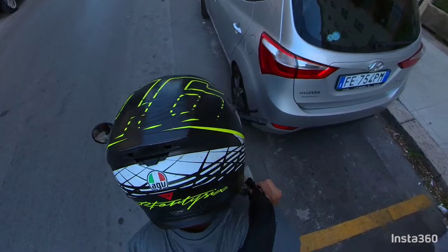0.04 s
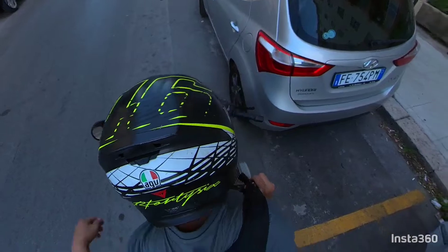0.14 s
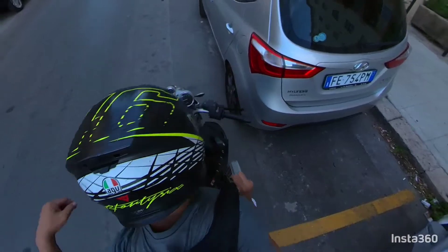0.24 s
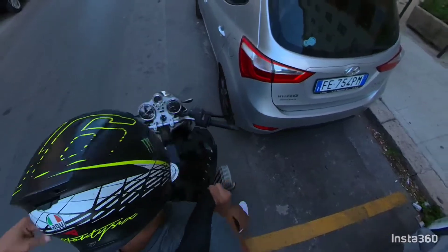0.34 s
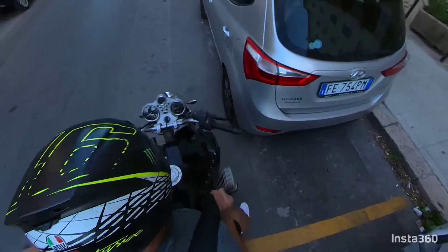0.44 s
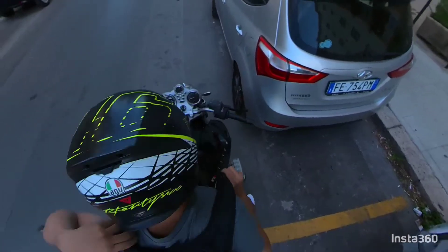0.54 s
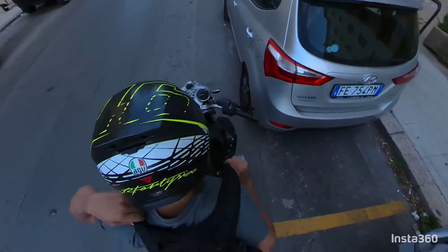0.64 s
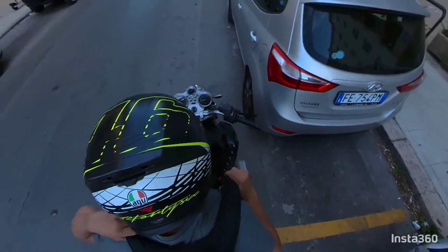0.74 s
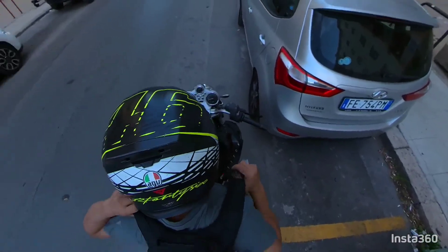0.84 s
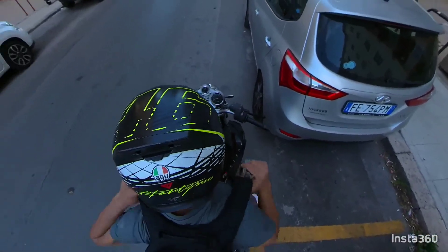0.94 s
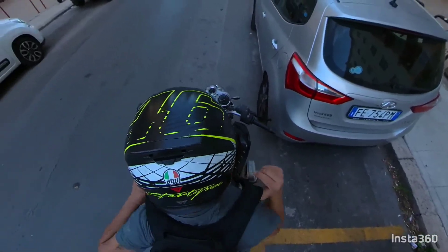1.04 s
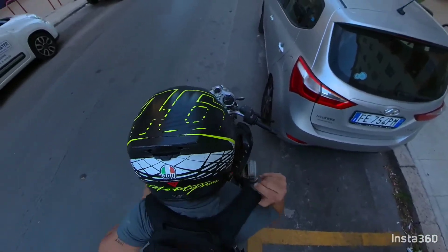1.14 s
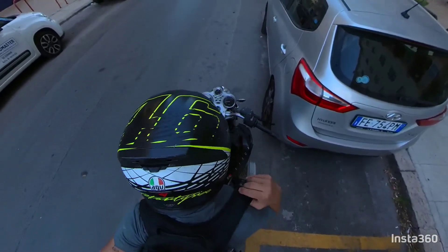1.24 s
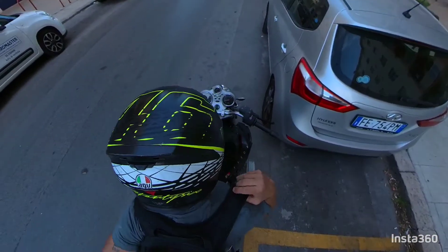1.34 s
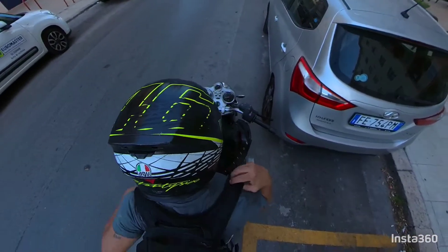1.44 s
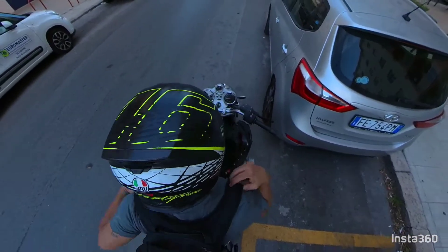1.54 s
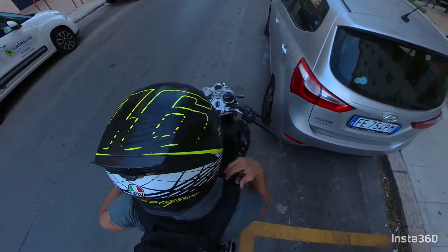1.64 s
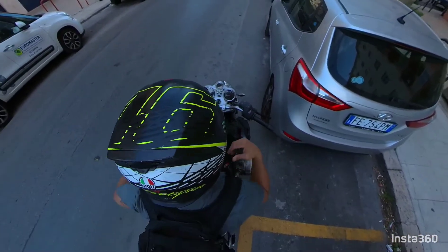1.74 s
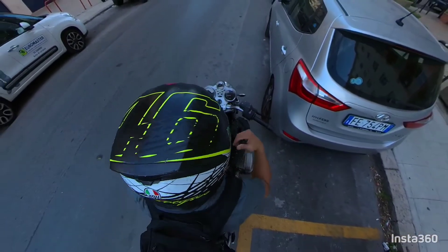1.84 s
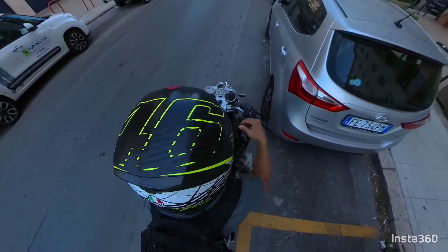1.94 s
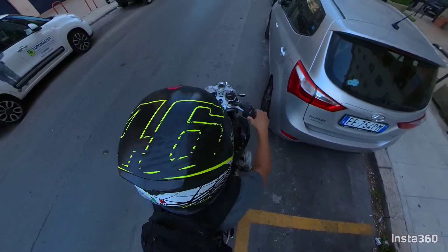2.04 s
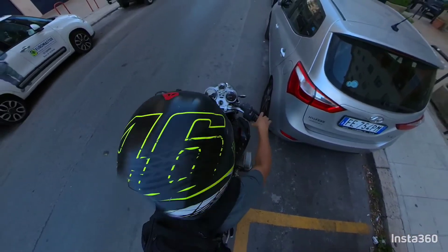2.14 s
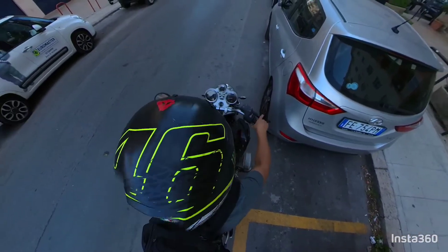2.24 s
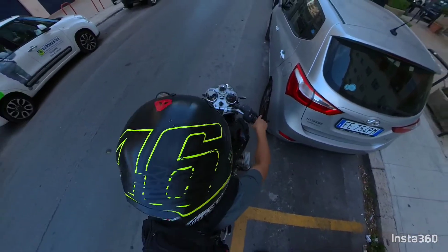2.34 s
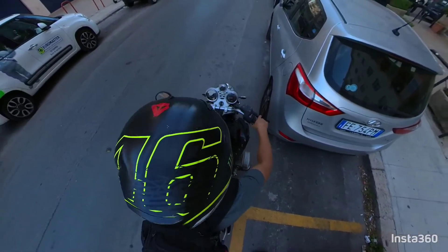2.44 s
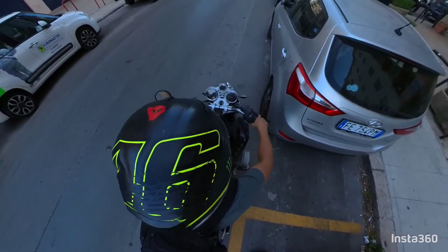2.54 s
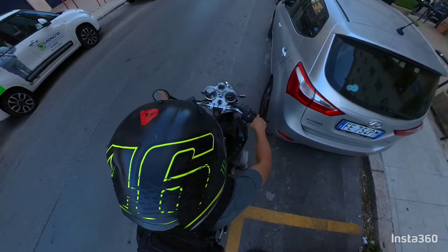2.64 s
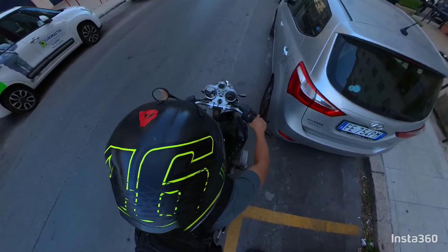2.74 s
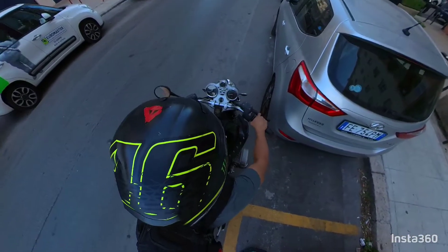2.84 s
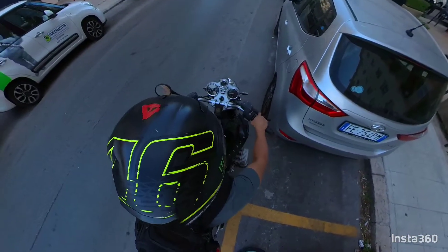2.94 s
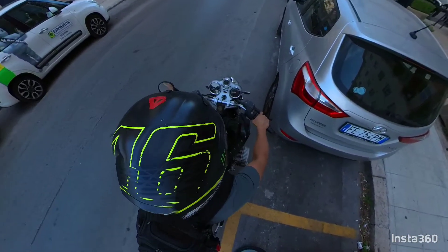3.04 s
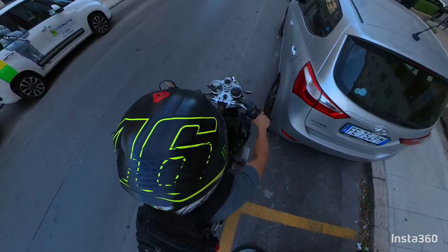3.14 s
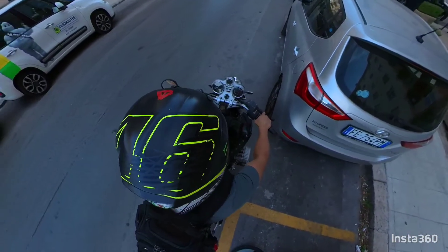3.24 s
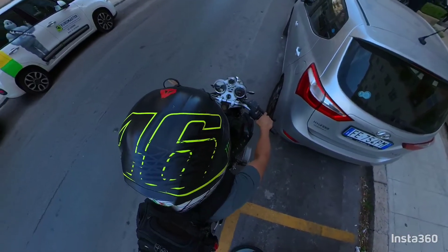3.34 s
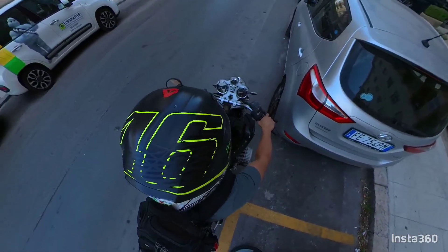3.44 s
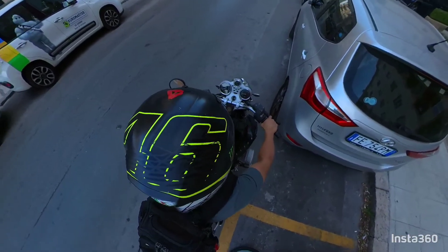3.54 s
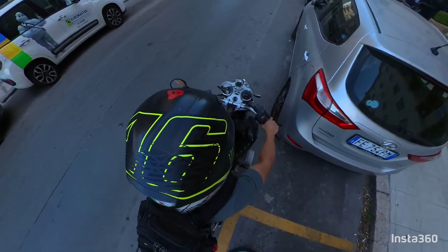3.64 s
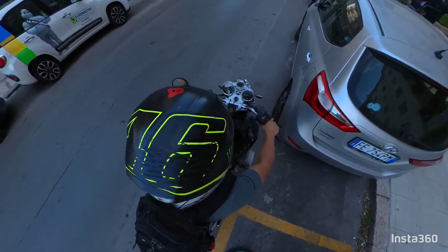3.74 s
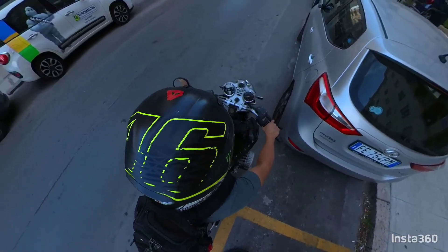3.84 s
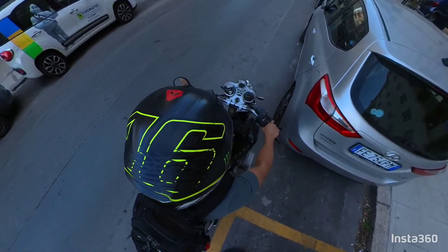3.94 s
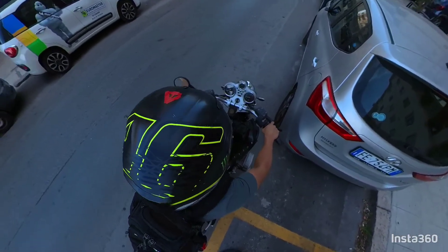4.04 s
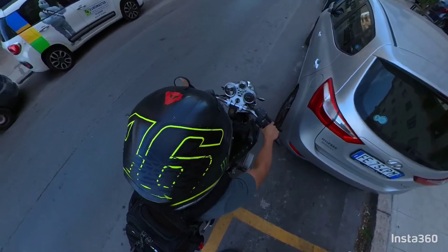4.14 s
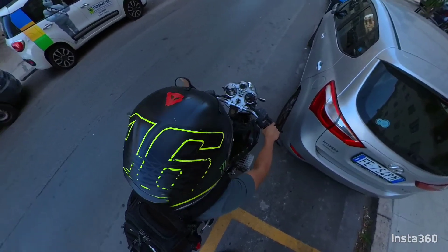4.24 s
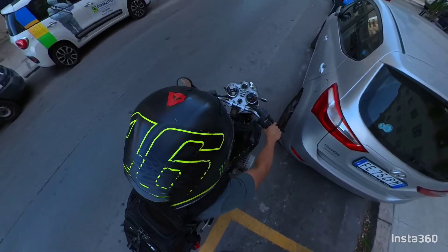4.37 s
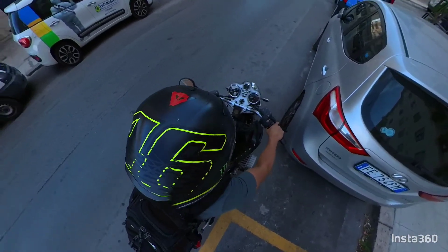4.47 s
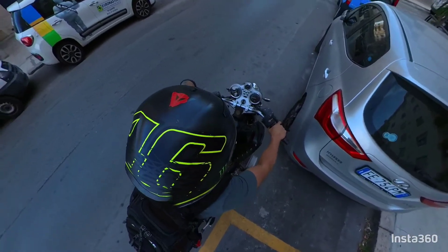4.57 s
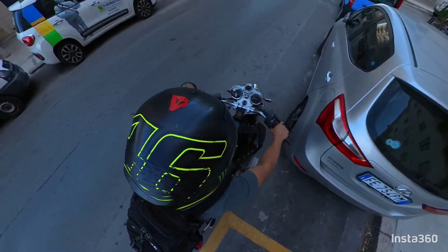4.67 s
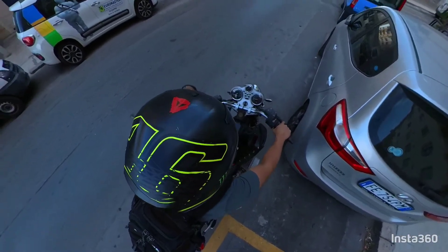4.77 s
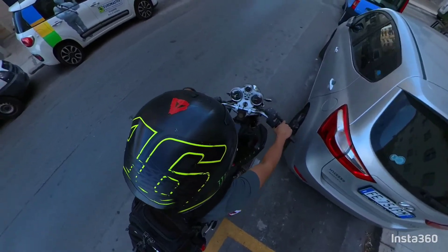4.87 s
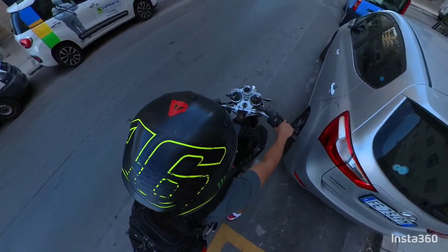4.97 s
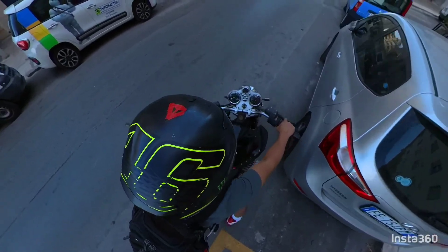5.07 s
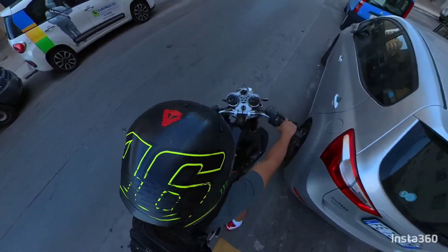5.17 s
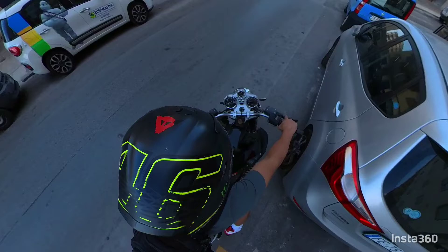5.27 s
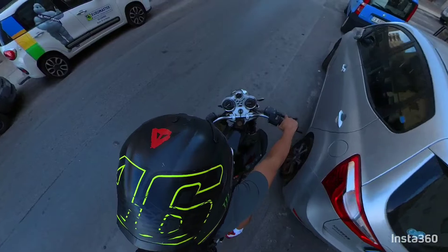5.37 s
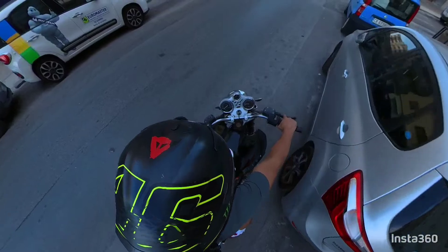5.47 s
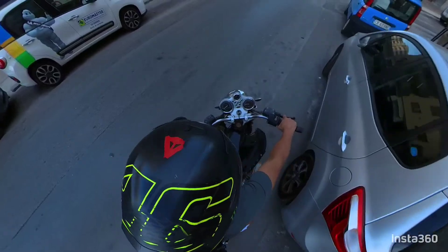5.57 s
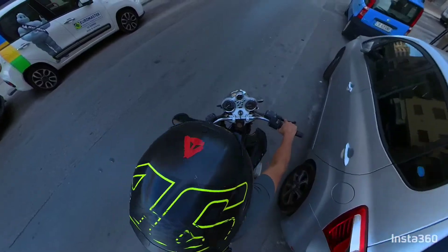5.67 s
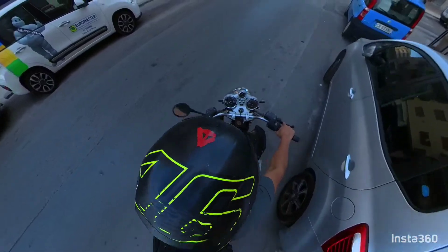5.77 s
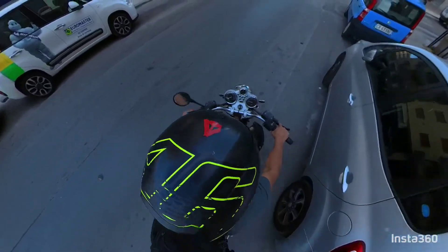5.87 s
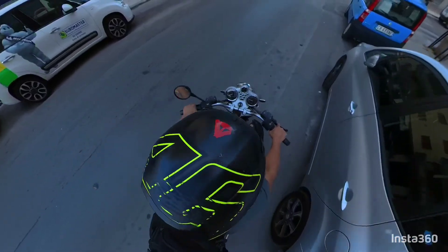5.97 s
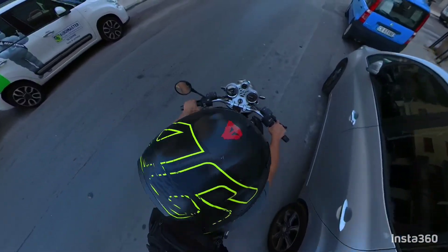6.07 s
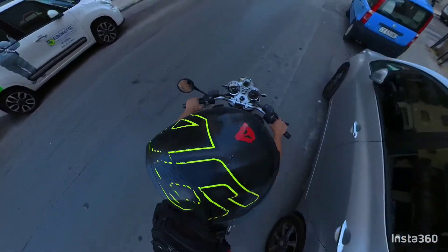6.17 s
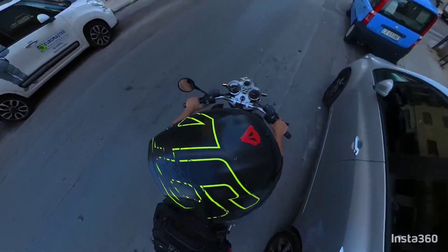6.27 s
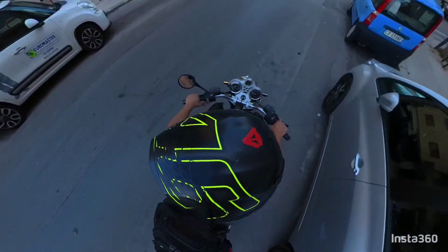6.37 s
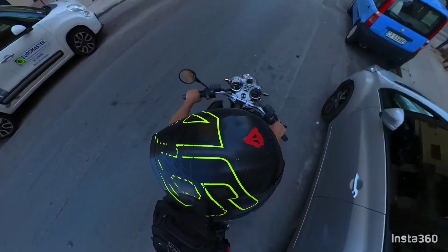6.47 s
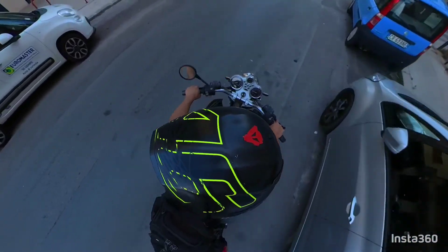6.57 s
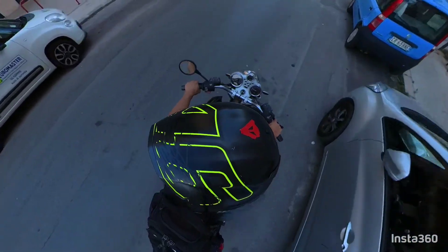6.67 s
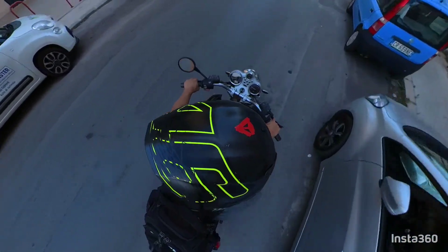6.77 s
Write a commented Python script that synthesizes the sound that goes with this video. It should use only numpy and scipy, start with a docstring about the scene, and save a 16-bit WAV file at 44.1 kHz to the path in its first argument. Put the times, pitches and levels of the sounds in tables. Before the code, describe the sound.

A motorcycle limps at a low, lumpy idle, heard from just behind the rider, whose movements knock the frame and rustle cloth. After about three seconds the image widens and gas roar and intake rush swell. First gear clunks, a pivot squeaks briefly, revs climb and the bike pulls away with solid knocks over faint street noise.

```python
"""A twin-cylinder motorcycle limps at idle in a street, heard from just behind the rider, who knocks the frame
and rustles; the lower range sits dead centre. Then the image opens, leaning right, as the gas roar swells;
first gear clunks in, a pivot squeaks, the revs climb and the bike pulls away, with more knocks on the frame.
Firing pulses ring the exhaust, pulsed noise makes gas roar, intake rush and valve rustle, and struck modes
make the knocks; street noise lies beneath."""
import sys
import numpy as np
from scipy import signal
from scipy.fft import rfft, irfft, next_fast_len
from scipy.io import wavfile
from scipy.ndimage import uniform_filter1d, map_coordinates

SR = 44100
rng = np.random.default_rng(int(sys.argv[2]) if len(sys.argv) > 2 else 0)


def transcribe(u):
    """Save the signal u as a 16-bit wav file named by the first command-line argument.

    u: samples, shape (n,) or (channels, n), limited to [-1, 1]; the rate is SR.
    q: integer samples, one column per channel.
    """
    v = np.clip(np.atleast_2d(u).T, -1, 1)
    q = np.round(v * 32767).astype(np.int16)
    wavfile.write(sys.argv[1], SR, q)


N = 300321
T = np.arange(N) / SR  # s

# Firing rate, one firing per crank turn: t/s, rate/Hz
REVS = [(0.0, 21.66), (0.35, 21.41), (1.58, 21.92), (2.11, 20.94), (3.29, 21.94), (3.97, 21.02),
        (4.24, 22.42), (4.39, 21.82), (4.62, 25.53), (4.8, 25.67), (5.19, 30.79), (5.57, 32.82),
        (5.74, 31.39), (6.09, 33.12), (6.21, 32.28), (6.36, 27.96), (6.62, 29.74), (6.81, 27.45)]
# Exhaust: t/s, silencer boom level/dB, gas roar level/dB
EXHAUST_LEVEL = [(0.0, -29, -54.5), (.3, -32, -54.5), (.75, -30.5, -50.5), (.95, -33.5, -55.5),
                 (1.4, -31.5, -55), (1.9, -32, -52.5), (2.1, -35.5, -56), (3.09, -32.5, -55.5),
                 (3.17, -28, -47.5), (3.53, -25, -37.5), (3.75, -26, -36.5), (4.0, -25.5, -34.5),
                 (4.25, -23, -34.5), (4.9, -22, -33), (5.2, -19.5, -32.5), (5.7, -16.5, -30.5),
                 (6.25, -19, -32), (6.45, -19.5, -32), (6.81, -19, -31.5)]
# Brief level changes of boom, shudder and pipe, mostly dips: t/s, change/dB
BRIEF_CHANGES = [(.6, -8.5), (1.185, -5), (1.55, -5.5), (3.09, -2), (6.39, 0.5)]
BRIEF_S = 0.026  # half length
QUIET_GAS_DB = -52  # "effort" is the gas roar above this level
FIRING_LEAD_TURNS_PER_HZ = 0.032  # the firing pulses run ahead as the revs rise
LIMP_FADE_DB = 9.5  # the limp fades out from 1.22 to 1.58 times this effort
LOAD_FROM_DB, LOAD_SPAN_DB = 15, 4  # effort at which the engine starts to pull, and the rise to full load
LOAD_LAG_TURNS = 0.16  # lag of the blast under full load at idle revs

# Silencer resonances: f/Hz, width/Hz, level/dB
SILENCER = [(73, 31, -7), (89, 18.5, 11.5), (101, 50, -4), (132.5, 26, -1.5), (174, 40, -17)]
# Exhaust pipe resonances: f/Hz, width/Hz, level/dB
PIPE = [(220, 222, -13.5), (273.2, 42.8, 2), (293.1, 25.5, 4), (344.5, 106, -14.5)]
PIPE_DB, PIPE_RISE = -46, 0.54  # level at quiet gas and first revs; dB per dB of effort
PIPE_REVS_DB = 17  # extra per doubling of the revs
RASP_DB = -19  # turbulent gas in the pipe, relative to its firing note
# Gas roar spectrum: f/Hz, relative level/dB per Hz
GAS = [(190, -11), (330, -4.5), (400, -15), (520, -12.5), (664, -11), (722, -16.5), (844, -13.5),
       (1110, -18.5), (1850, -23), (2530, -30.5), (4000, -32), (5200, -39), (8800, -120)]
# Exhaust growl resonances: f/Hz, width/Hz, level/dB
GROWL = [(355, 9.7, -23), (491.7, 11.6, 13), (520, 28, 6), (588, 27, 5.5), (663, 17.7, 9), (780, 120, -2.5),
         (958, 17, 5)]
GROWL_DB = -9.5  # relative to the gas roar
# Outlet resonances: f/Hz, width/Hz, level/dB
OUTLET = [(460, 150, 5), (654, 360, -10), (1020, 1070, -5.5), (1590, 1500, -15)]
OUTLET_DB = -13.5  # relative to the gas roar
# Header pipe resonances: f/Hz, width/Hz, level/dB
HEADER = [(415, 45, 0), (478, 40, 0)]
HEADER_DB = -7  # relative to the gas roar, at full load and idle revs
# Piston slap resonances: f/Hz, width/Hz, level/dB
PISTON = [(1460, 350, -2), (2760, 690, 0)]
PISTON_DB = -23.5  # relative to the gas roar, at full load
# Frame shudder resonances: f/Hz, width/Hz, level/dB
SHUDDER = [(34.8, 21, 6), (136, 12, -0.5), (198, 188, -0.5)]
SHUDDER_DB = -18.0  # relative to the boom, at first revs, before its slow wander
SHUDDER_REVS_DB = 6.5  # extra per doubling of the revs
RIDER_SETTLES_S, FIDGET_DB = 1.96, 4.5  # until then the rider shifts about and the frame shudders more

# Loose tappet resonances: f/Hz, width/Hz, level/dB
TAPPET = [(790, 440, -1.7), (1180, 380, 0.6), (1767, 170, -1.2)]
TAPPET_DB = -62.5
# Engine case resonances: f/Hz, width/Hz, level/dB
CASES = [(2325, 1600, 13.5), (3230, 93, 14.5), (3960, 1450, 14)]
VALVES_DB, VALVES_RISE = -58.5, 0.42  # case rustle at quiet gas; dB per dB of effort
# Cooling fin resonances: f/Hz, width/Hz, level/dB
FINS = [(522, 29, 15), (1130, 620, 7), (1764, 190, 10.5), (4920, 460, 9.5), (6200, 4300, -0.5),
        (7100, 1200, 2), (8270, 1700, 1), (9350, 2100, 4), (10900, 1230, 4.5)]
# Cooling fin rustle: t/s, level/dB
FIN_LEVEL = [(0.0, -51.5), (3.05, -51), (3.2, -46.5), (3.55, -52), (3.7, -73), (4.7, -61), (5.3, -54),
             (6.3, -54.5), (6.81, -56)]
# Airy top resonances: f/Hz, width/Hz, level/dB
AIR = [(11600, 660, -4), (12600, 4800, 7), (14100, 720, -9)]
# Top hiss before its one swell: t/s, level/dB
HISS_LEVEL = [(0, -69), (3.05, -67), (3.5, -55.5), (4.0, -55.5), (4.5, -54.5), (5.0, -51.5), (5.5, -50),
              (6.0, -51), (6.4, -56), (6.81, -53)]
# The one swell of the top hiss: t/s, half length/s, boost/dB
TREBLE_SWELL = (3.2, 0.19, 6)
# Intake resonances: f/Hz, width/Hz, level/dB
INTAKE = [(1030, 920, 2.5), (1730, 960, -0.5), (2160, 1160, -4)]
# Intake roar: t/s, level/dB
INTAKE_LEVEL = [(3.08, -77), (3.16, -48), (3.4, -51), (3.7, -45.5), (4.0, -42), (4.4, -45.5), (4.8, -45),
                (5.3, -41.5), (5.9, -45.5), (6.3, -50), (6.81, -51)]

# Gearbox resonances: f/Hz, width/Hz, level/dB
GEARBOX = [(200, 26, 10.5), (257, 66, 14.5), (519, 170, 9), (844, 450, 1), (1250, 440, 1.5), (1740, 520, 1),
           (2540, 680, -3.5), (3850, 1500, -8)]
# Gear clunks: t/s, level/dB rms, rise/s, grind from onset/s, fade to -26 dB/s
CLUNKS = [(3.794, -25, 0.006, 0.017, 0.05), (3.862, -25, 0.014, 0.028, 0.1)]
# Frame modes: f/Hz, level before tilt and scatter/dB, t60/s
FRAME = [(135, -4.5, 0.089), (149.6, -7.5, 0.22), (174, 3.5, 0.1), (228, -0.5, 0.053), (300, -3, 0.031),
         (513, 6, 0.019), (663, 6, 0.019), (850, -34, 0.012), (1130, -4, 0.048), (2570, -7, 0.028),
         (3370, -7.5, 0.014), (4200, 7, 0.037)]
# Knocks on the frame: t/s, peak level/dB, contact time/ms, tilt/dB per octave
KNOCKS = [(0.035, -19.5, 5.5, 14), (0.125, -25, 0.1, 0.5), (0.256, -28, 0.5, 2), (0.43, -23, 3.9, -11),
          (0.547, -13.5, 0.67, -2), (0.571, -31.5, 0.99, 1), (0.772, -30, 4.4, -9), (0.835, -28.5, 3, -3),
          (0.91, -30, 3.5, -3), (1.101, -21.5, 4.8, -12), (1.312, -32, 8, -3), (1.512, -22, 3.45, 0),
          (1.706, -22.5, 1.4, -5.5), (1.718, -18, 3.2, 3), (2.642, -39, 0.51, 6), (5.72, -12, 2.1, 3),
          (5.744, -9.5, 2.2, 4), (5.763, -22, 1.3, 3), (6.723, -9.5, 2.7, 7)]
KNOCK_SCATTER_DB = 3  # each blow wakes the modes differently
CRACK_DB, CRACK_S = -10, 0.0086  # contact noise relative to the modes' peak; decay time
# Pivot squeaks: t/s, f/Hz, fundamental peak level/dB, half length/s
SQUEAKS = [(4.136, 1335, -32, .016)]
# Cloth and glove scuffs: t/s, half length/s, level before grain/dB rms, f/Hz, width/Hz
SCUFFS = [(0.623, 0.054, -53, 1490, 1600), (0.71, 0.12, -60, 2260, 1500), (0.712, 0.076, -54, 10500, 2500),
          (3.954, 0.068, -49.5, 2970, 1190)]
# Street spectrum: f/Hz, relative level/dB per Hz
STREET = [(25, 13.5), (45, -7), (120, 5), (400, -34), (1500, -20.5), (4000, -30.5)]
STREET_DB = -41.5  # before its slow wander

# Stereo lean: f/Hz, left minus right level/dB
LEAN = [(60, -4), (250, -3), (700, -2), (2400, -2), (8000, -0.5)]
# Port phase: f/Hz, lead of the left port/rad
LEAD = [(0, 0), (2070, 1.4), (2330, 1.8), (7320, 6.3), (15000, 6.3)]
OPENS_S, CENTRED_BELOW_HZ = 3.13, 3680  # the image opens; until then this range is in the centre
BASS_CUT_HZ, TOP_HZ = 94.7, 14250


def engine():
    """Exhaust, valve gear and intake pulse in time with one crank; fins, hiss and intake have own level curves."""
    hz, = columns(REVS)
    boom_db, gas_db = columns(EXHAUST_LEVEL)
    effort_db = gas_db - QUIET_GAS_DB
    octaves = np.log2(hz / hz[0])
    brief_db = sum(db * np.exp(-((T - s) / BRIEF_S) ** 2) for s, db in BRIEF_CHANGES)
    # one cylinder limps at idle; it evens out with revs and under load
    idle = (hz[0] / hz) ** 4
    limp = idle * np.clip(2.5 - (effort_db / LIMP_FADE_DB) ** 2, 0, 1)
    pull = np.clip((effort_db - LOAD_FROM_DB) / LOAD_SPAN_DB, 0, 1)
    turns = np.cumsum(hz) / SR + FIRING_LEAD_TURNS_PER_HZ * (hz - hz[0])
    cam = (turns - .65) / 2  # the camshaft turns once for two firings
    blast = turns - LOAD_LAG_TURNS * pull * np.sqrt(idle)
    chug = gas_chug(blast, cam, idle)

    boom = silencer_boom(hz, turns, idle) + frame_shudder(octaves)
    pipe_db = PIPE_DB + PIPE_RISE * effort_db + PIPE_REVS_DB * octaves
    pipe = undb(pipe_db) * pipe_note(hz, turns, idle, limp, chug)
    out = undb(brief_db) * (undb(boom_db) * boom + pipe)
    roar = gas_roar(hz, turns, blast, limp, chug)
    out = out + undb(gas_db) * (roar + pull * load_knock(hz, turns, idle))
    return out + tappet(cam) + valve_gear(turns, cam, effort_db) + intake(blast)


def gas_chug(blast, cam, idle):
    """Gas flow swells at each firing, more weakly for every second one at idle."""
    swell = puffs(blast - 1.65, fade=.25, base=1.3 - .8 * idle)
    weak_half = undb(-1.5 * idle * (cam % 1 > .5))
    return swell * strokes(blast - .65, scatter_db=.8) * weak_half


def silencer_boom(hz, turns, idle):
    """Each firing's pressure pulse rings the silencer's low resonances."""
    thud = firings(turns - .03, weak_db=-.8 * idle, scatter_db=.5, jitter_ms=.12)
    thud = thud * strokes(turns + .47, scatter_db=1.2 * idle)
    return steady(ring(thud, SILENCER), hz)


def frame_shudder(octaves):
    """Noise rings the frame's loose parts, with a wandering level and more while the rider fidgets."""
    fidget_db = FIDGET_DB * np.clip((RIDER_SETTLES_S - T) * 10, 0, 1)
    level_db = SHUDDER_DB + SHUDDER_REVS_DB * octaves + fidget_db + 4.7 * walk(7.6)
    return unit(ring(pair(.15), SHUDDER)) * undb(level_db)


def pipe_note(hz, turns, idle, limp, chug):
    """Firing pulses give the pipe its note; chugging turbulence rings the same resonances as rasp."""
    blow = firings(turns - 1.55 - .05 * (1 - idle), weak_db=-1.2 - 5 * limp, scatter_db=1.0, jitter_ms=.08)
    rasp = unit(ring(pair(1.0) * chug, PIPE))
    return steady(ring(blow, PIPE), hz) + undb(RASP_DB) * rasp


def gas_roar(hz, turns, blast, limp, chug):
    """Gas roars as noise puffs, one a firing; sharp pulses add the growl and the snap at the outlet."""
    roar = unit(colour(pair(0.84) * chug, GAS))
    bark = firings(turns - 1.7, weak_db=-6.0 * limp, scatter_db=1.2, jitter_ms=.08)
    growl = undb(GROWL_DB) * steady(ring(bark, GROWL), hz)
    snap = firings(blast - 1.64, weak_db=-6 * limp, scatter_db=1.8, jitter_ms=.25)
    return roar + growl + undb(OUTLET_DB) * steady(ring(snap, OUTLET), hz)


def load_knock(hz, turns, idle):
    """One cylinder rings its header pipe and slaps its piston, once for two firings."""
    even = np.zeros(N)
    header_hits = firings((turns - 1.8) / 2, weak_db=even, scatter_db=1.5, jitter_ms=.3)
    slap_hits = firings((turns - 1.97) / 2, weak_db=even, scatter_db=2.5, jitter_ms=.8)
    header = undb(HEADER_DB) * np.sqrt(idle) * steady(ring(header_hits, HEADER), hz)
    return header + undb(PISTON_DB) * steady(ring(slap_hits, PISTON), hz)


def tappet(cam):
    """One loose tappet clacks on every turn of the cam: short noise puffs ring it."""
    clack = puffs(cam - .04, fade=0.075, base=0) * strokes(cam - .9 + 1, scatter_db=2.2)
    return undb(TAPPET_DB) * unit(ring(pair(0.56) * clack, TAPPET))


def valve_gear(turns, cam, effort_db):
    """Noise ticking with cam and crank rustles through cases, fins and airy top, in flickering strips."""
    swell_s, half_s, swell_db = TREBLE_SWELL
    hiss_db = columns(HISS_LEVEL)[0] + swell_db * np.exp(-((T - swell_s) / half_s) ** 4)
    levels = VALVES_DB + VALVES_RISE * effort_db, columns(FIN_LEVEL)[0], hiss_db
    out = 0
    # a larger "smooth" makes the ticks less distinct
    for db, modes, alike, smooth in zip(levels, (CASES, FINS, AIR), (.3, .5, .7), (1.6, 1.5, 2.0)):
        cam_ticks = puffs(cam + 0.16, fade=0.067, base=0.6 * smooth)
        ticks = cam_ticks * puffs(turns - .5, fade=0.07, base=1.3 * smooth)
        panels = 0
        for mode in modes:
            panels = panels + undb(.4 * walk(2.5) + 1.2 * walk(20)) * ring(pair(alike) * ticks, [mode])
        out = out + undb(db) * unit(patchy(panels, db=5.5, strip_hz=130., hold_s=.045))
    return out


def intake(blast):
    """Air rushes through the intake once the throttle opens: noise gulping a little at each firing."""
    gulp = puffs(blast - 1.7, fade=.3, base=2.1) * strokes(blast - .7, scatter_db=1.0)
    rush = patchy(ring(pair(0.46) * gulp, INTAKE), db=3.5, strip_hz=146.0, hold_s=.03)
    return undb(columns(INTAKE_LEVEL)[0]) * unit(rush)


def gear():
    """The dogs of first gear grind, then bite: bursts of rattling noise ring the gearbox."""
    shape = np.zeros(N)
    for s, db, rise, grind, fade in CLUNKS:
        onset = np.clip((T - s) / rise, 0, 1)
        shape += undb(db) * onset * np.exp(-np.clip(T - s - grind, 0, 1) / fade * 3)
    rattle = pair(.8) * undb(2.5 * walk(500))
    return shape * unit(ring(rattle, GEARBOX))


def knocks():
    """The rider's moves knock the frame: a push rings decaying modes, a longer contact dulls them."""
    out, t = np.zeros(N), T[:SR // 5]
    for s, db, contact_ms, tilt_db in KNOCKS:
        modes = np.zeros(len(t))
        for hz, mode_db, t60 in FRAME:
            gain = undb(mode_db + tilt_db * np.log2(hz) + KNOCK_SCATTER_DB * rng.standard_normal())
            modes += gain * np.sin(2 * np.pi * hz * t) * np.exp(-np.log(1000) * t / t60)
        crack = undb(CRACK_DB) * np.abs(modes).max() * rng.standard_normal(len(t)) * np.exp(-t / CRACK_S)
        push = np.hanning(int(contact_ms * SR / 1000) + 3)
        blow = np.convolve(modes + crack, push)[:len(t)]
        i = int(s * SR)
        out[i:i + len(t)] += (undb(db) * blow / np.abs(blow).max())[:N - i]
    return out


def squeak():
    """A pivot squeaks: a short tone with two overtones."""
    out = np.zeros(N)
    for s, hz, db, half in SQUEAKS:
        tone = sum(g * np.sin(2 * np.pi * k * hz * T) for k, g in enumerate((1, .15, .2), 1))
        out += undb(db) * np.exp(-((T - s) / half) ** 4) * tone
    return out


def scuffs():
    """Cloth and gloves rub: short grainy hisses of band noise."""
    out = 0
    for s, half, db, hz, width in SCUFFS:
        shape = undb(db + 4.6 * walk(91)) * np.exp(-((T - s) / half) ** 2)
        out = out + shape * unit(ring(pair(0.15), [(hz, width, 0)]))
    return out


def street():
    """Distant traffic: coloured noise with a slowly wandering level."""
    return undb(STREET_DB + 2.0 * walk(2.7)) * unit(colour(pair(0.57), STREET))


def firings(turns, weak_db, scatter_db, jitter_ms):
    """One pulse per turn; every second one is changed by weak_db, and each differs a little."""
    at = np.flatnonzero(np.diff(np.floor(turns)))
    late, strength = rng.standard_normal((2, len(at)))
    where = np.clip(at + (late * jitter_ms * SR / 1000).astype(int), 0, N - 1)
    pulses = np.zeros(N)
    pulses[where] = undb((weak_db * (np.floor(turns) % 2))[at] + scatter_db * strength)
    return pulses


def strokes(turns, scatter_db):
    """A gain that changes from one turn to the next."""
    chance = rng.standard_normal(400)[np.floor(turns).astype(int)]
    return undb(scatter_db * uniform_filter1d(chance, size=200))


def puffs(turns, fade, base):
    """Envelope that swells quickly at each turn and fades over a share of it."""
    return unit(base + uniform_filter1d(np.exp(-(turns % 1) / fade), size=300))


def ring(x, modes):
    """Sum of resonances of alternating sign, each passed twice so that it swells in and has steep skirts."""
    out = 0
    for k, (hz, width, db) in enumerate(modes):
        once = np.concatenate(signal.iirpeak(hz, hz / width, SR))
        out = out + (-1) ** k * undb(db) * signal.sosfilt(np.tile(once, (2, 1)), x)
    return out


def colour(x, points):
    """Filter by (f/Hz, level/dB) points joined on a log frequency axis."""
    size = next_fast_len(N)
    hz, db = np.transpose(points)
    f = np.log(np.fft.rfftfreq(size, 1 / SR) + 1)
    return irfft(rfft(x, size) * undb(np.interp(f, np.log(hz), db)), size)[..., :N]


def patchy(x, db, strip_hz, hold_s):
    """Narrow strips of the spectrum flicker, each on its own."""
    f, t, z = signal.stft(x, SR, nperseg=512)
    grid = rng.standard_normal((200, 800))
    where = np.meshgrid(f / strip_hz, t / hold_s, indexing="ij")
    field = map_coordinates(grid, where, order=1, mode="mirror")
    return signal.istft(z * undb(db * field), SR, nperseg=512)[1][..., :N]


def pair(alike):
    """Noise for two ports, alike by the given share."""
    mid, side = rng.standard_normal((2, N))
    alike = np.clip(alike, 0, 1)
    return np.sqrt((1 + alike) / 2) * mid + np.sqrt((1 - alike) / 2) * np.outer([1, -1], side)


def walk(rate):
    """Smoothed chance with the given number of steps a second, level 1."""
    k = int(SR / rate)
    steps = np.repeat(rng.standard_normal(N // k + 1), k)
    return unit(uniform_filter1d(uniform_filter1d(steps, k), k)[:N])


def steady(x, hz):
    """Level 1 overall, evened out for the firing rate."""
    return unit(x / np.sqrt(hz))


def columns(table):
    """Curve columns, sample by sample."""
    s, *cols = np.transpose(table)
    return [np.interp(T, s, c) for c in cols]


def undb(db):
    """Decibels to gain."""
    return 10 ** (np.asarray(db) / 20)


def unit(x):
    """Scale to an rms of 1."""
    return x / np.sqrt(np.mean(x ** 2))


def scene():
    """The engine, the gear and the rider over the street."""
    return engine() + gear() + knocks() + squeak() + scuffs() + street()


def record(dry):
    """Two ports a few centimetres apart; the lower range is shared until the image opens; rumble and top are cut."""
    f = np.fft.rfftfreq(N, 1 / SR)
    lean_hz, lean_db = np.transpose(LEAN)
    half = np.sqrt(undb(np.interp(np.log(f + 1), np.log(lean_hz), lean_db)))
    right = np.exp(-1j * np.interp(f, *np.transpose(LEAD))) / half
    wide = irfft(rfft(dry) * [half, right], N)
    mid, side = dry.mean(axis=0), (dry[0] - dry[1]) / 2
    high_side = signal.sosfilt(signal.butter(8, CENTRED_BELOW_HZ, "high", fs=SR, output="sos"), side)
    centred = np.array([mid + high_side, mid - high_side])
    opened = np.clip((T - OPENS_S) / 0.0016, 0, 1)
    both = opened * wide + (1 - opened) * centred
    both = signal.sosfilt(signal.butter(2, BASS_CUT_HZ, "high", fs=SR, output="sos"), both)
    return signal.sosfilt(signal.ellip(12, .2, 80, TOP_HZ, fs=SR, output="sos"), both)


dry = scene()
out = record(dry)
transcribe(out)
```